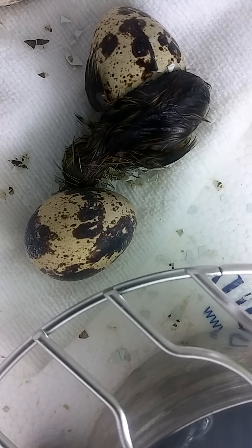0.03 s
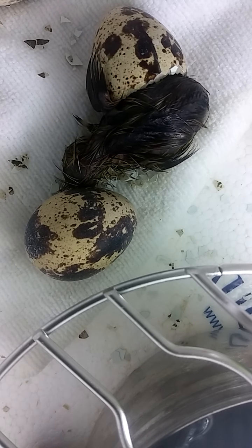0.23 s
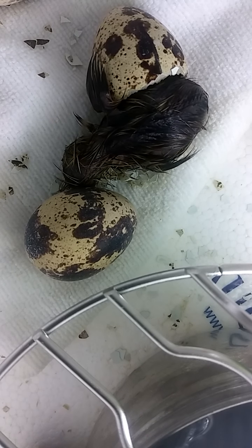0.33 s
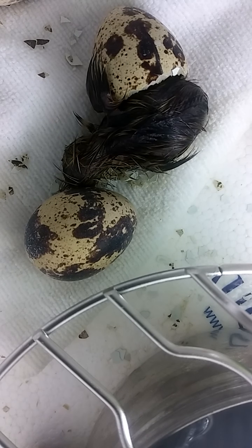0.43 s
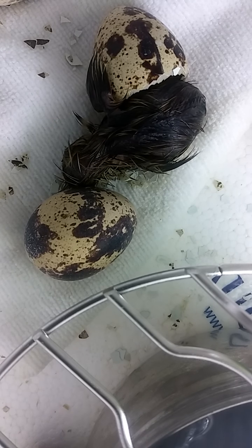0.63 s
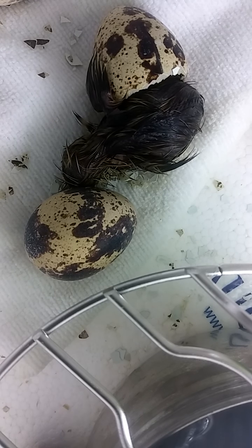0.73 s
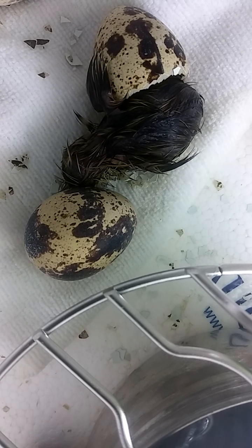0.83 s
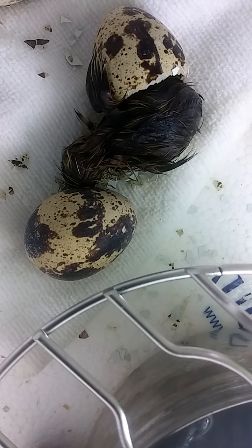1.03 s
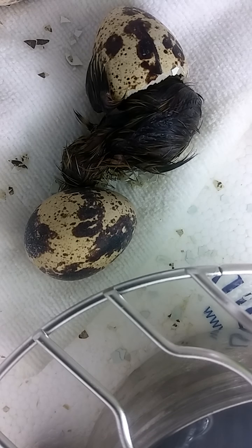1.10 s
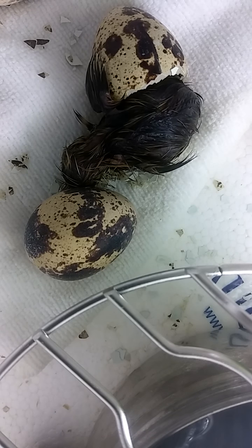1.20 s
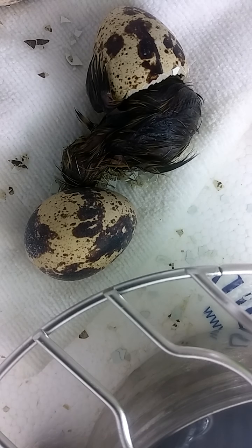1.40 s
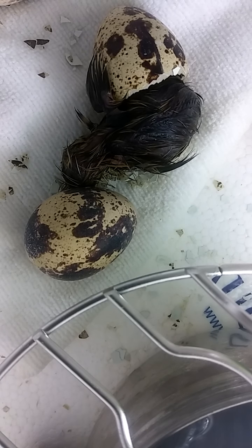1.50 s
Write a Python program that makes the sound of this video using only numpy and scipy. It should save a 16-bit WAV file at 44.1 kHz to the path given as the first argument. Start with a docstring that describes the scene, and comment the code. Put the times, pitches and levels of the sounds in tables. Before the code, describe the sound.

Small hard ticks sound close by in a plastic egg incubator, about four or five a second, loudest near 0.75 seconds. Each rings the housing briefly and fades in the room. Softer taps follow around 1.15 and 1.25 seconds, with a faint last one at 1.45. Hollow knocks join the contacts at about 0.6 and 1.25 seconds. A quiet fan hums steadily throughout.

```python
"""Beside a plastic egg incubator: small hard ticks, about 4.5 a second, then a few softer taps.
Each tick swells for some milliseconds as it scatters between the walls, rings the housing and
fades in the room. Heavier contacts add a hollow knock. The fan hums steadily underneath."""
import sys
import numpy as np
from scipy import signal
from scipy.fft import rfft, irfft
from scipy.io import wavfile

SR = 44100
rng = np.random.default_rng(int(sys.argv[2]) if len(sys.argv) > 2 else 0)


def file_out(sig):
    """Save sig as 16-bit WAV at sys.argv[1]."""
    # one column per channel
    cols = np.atleast_2d(sig).T
    # limit, then scale
    lim = np.clip(cols, -1, 1)
    pcm = np.round(lim * 32767).astype(np.int16)
    wavfile.write(sys.argv[1], SR, pcm)


N = 68355


def undb(db):
    """Decibels to gain."""
    return 10 ** (np.asarray(db) / 20)


def unit(x):
    """Scale to rms 1."""
    return x / np.sqrt(np.mean(x ** 2))


def colour(x, hz, db):
    """Filter by a curve of dB over log frequency."""
    bins_hz = np.fft.rfftfreq(2 * len(x), 1 / SR)
    gain = undb(np.interp(np.log(bins_hz + 1), np.log(hz), db))
    return irfft(rfft(x, 2 * len(x)) * gain)[:len(x)]


def narrow_noise(hz, width_hz):
    """Noise in one steep resonance, rms 1."""
    bins_hz = np.fft.rfftfreq(2 * N, 1 / SR)
    detune = 2 * (bins_hz - hz) / width_hz
    return unit(irfft(rfft(rng.standard_normal(2 * N)) / (1 + detune ** 2))[:N])


def envelope(age_s, swell_s, t60_s):
    """Linear rise, then exponential decay."""
    rise = np.clip(age_s / swell_s, 0, 1)
    return rise * np.exp(-np.log(1000) * np.maximum(age_s - swell_s, 0) / t60_s)


def ring(age_s, modes, swell_s, tilt_db_per_oct=0):
    """Decaying modes, new phases at each strike; the tilt pivots at 1 kHz."""
    phases = rng.uniform(0, 2 * np.pi, len(modes))
    out = np.zeros(N)
    for (hz, db, t60_s), phase in zip(modes, phases):
        gain = undb(db + tilt_db_per_oct * np.log2(hz / 1000))
        out += gain * np.sin(2 * np.pi * hz * age_s + phase) * envelope(age_s, swell_s, t60_s)
    return out


def fan():
    """Soft rush of air, two steady motor tones and a wavering hum."""
    # Each row: frequency in Hz, relative level in dB.
    air_curve = [(18, -40), (30, -15.5), (134, -19.5), (204, -12.5), (273, -12), (319, -13.5), (437, -4.5),
                 (569, -16), (632, -7.5), (780, -12), (937, -7), (1130, -11.5), (1390, -11), (4300, -20.5),
                 (16000, -40)]
    # Each row: frequency in Hz, level in dB.
    motor_tones = [(439, -67), (721.5, -64.5)]
    # Each row: centre in Hz, width in Hz, level in dB.
    hum_bands = [(66.4, 11, -79), (159.4, 31, -75.5), (444, 15, -70), (509.6, 25.6, -66.5),
                 (616, 8.7, -70.5), (830.5, 10, -70)]
    t = np.arange(N) / SR
    air = undb(-57) * unit(colour(rng.standard_normal(N), *np.array(air_curve).T))
    motor = sum(undb(db) * np.sin(2 * np.pi * (hz * t + rng.random())) for hz, db in motor_tones)
    hum = sum(undb(db) * narrow_noise(hz, width_hz) for hz, width_hz, db in hum_bands)
    return air + motor + hum


def knocks():
    """Two heavier contacts sound the hollow body; one light touch rings thinly."""
    # Each row: start in seconds, swell in seconds, gain in dB, tilt in dB per octave.
    contacts = [(0.575, .024, -41.5, -10), (1.235, 0.019, -42, -0.5)]
    # Each row of both: frequency in Hz, gain in dB, T60 in seconds.
    body_modes = [(644.4, -0.5, 0.17), (695, -11.5, 0.48), (760, -6, 0.39), (1093, -1, 0.32),
                  (1165, -8, .27), (1478, 1.5, 0.17), (1580, -1.5, 0.17), (1635, -1.5, 0.31),
                  (1744, -8.5, 0.35), (2440, -3, 0.35), (2490, -7, 0.39), (2940, -9, 0.4),
                  (3100, -11, 0.19), (3910, -11, 0.25)]
    touch_modes = [(1017, -59, .33), (1200, -53, .3), (1275, -58, .22), (1416, -52, .35)]
    t = np.arange(N) / SR
    hollow = sum(undb(db) * ring(t - start_s, body_modes, swell_s, tilt)
                 for start_s, swell_s, db, tilt in contacts)
    touch_start_s = 1.148
    return hollow + ring(t - touch_start_s, touch_modes, swell_s=0.032)


def wall_scatter(noise, age_s, swell_s):
    """Dense reflections between the walls: treble peaks first, lows build up."""
    # Each row: band centre in Hz, spectral density in dB, T60 in seconds.
    bands = [(151, -34, 0.25), (278, -6, 0.57), (425, -11, 0.24), (630, 0, 0.46), (870, -9, 0.9),
             (1065, -2, 0.44), (1650, -2, 0.32), (1960, -4.5, 0.39), (2270, -1, 0.34), (3430, -3, 0.27),
             (5800, 1, 0.21), (7570, -1.5, 0.23), (10600, -7, 0.26), (14400, -2, 0.16)]
    log_centres = np.log([hz for hz, _, _ in bands])
    log_bins = np.log(np.fft.rfftfreq(N, 1 / SR) + 1)
    spectrum, out = rfft(noise), np.zeros(N)
    for (hz, db, t60_s), selector in zip(bands, np.eye(len(bands))):
        band = irfft(spectrum * np.interp(log_bins, log_centres, selector), N)
        band_swell_s = swell_s * (4000 / hz) ** 0.21
        out += band * undb(db) * envelope(age_s, band_swell_s, t60_s)
    return out


def ticks():
    """Each tick: the part's brief ping, scatter, housing ring and room tail, coloured by hardness."""
    # Each row: start in seconds, swell in seconds, gain in dB, ring gain in dB, ping gain in dB,
    # then gain in dB at each of colour_hz. The first tick is already fading at time zero.
    contacts = [(-0.115, .010, -38.5, -13, -12, 6, -11, 0, 0, -2, -14),
                (0.103, 0.011, -31, -9, -8, -11.5, -14, 0, 7, -6, -13),
                (0.315, 0.0081, -32, -8, -9.5, -5.5, -1, 5, 2.5, -5, -14),
                (0.546, 0.011, -29.5, -7.5, -11, -5.5, 3, 8, 2, -7.5, -19.5),
                (0.575, 0.0027, -31.5, -3.5, 4, -5.5, -0.5, -9.5, 0, -7.5, -24),
                (0.752, 0.0078, -26.5, -7.5, -5, -11, -3.5, 2, -2, -15, -22.5),
                (1.147, 0.024, -47, -22, -22, -1, 8, -1.5, -9.5, -8.5, -16),
                (1.236, 0.012, -38.5, -18, -4, -1, 7, 7, -4, -9, -16.5),
                (1.450, 0.014, -42.5, -28, -41, -26, -28, -12, -18, -11, -21)]
    colour_hz = [650, 1300, 2400, 4300, 8000, 14000]
    # Each row of both: frequency in Hz, gain in dB, T60 in seconds.
    ping_modes = [(2492, 0, 0.1), (2613, -6, 0.052), (3015, -6, 0.1), (3346, -12, 0.13)]
    housing_modes = [(649.4, -1.5, 0.36), (1093, -1.5, 0.34), (1186, -2.5, 0.19), (1484, -5, 0.16),
                     (1566, -3, 0.21), (1655, -1.5, 0.25), (2093, 1.5, 0.22), (2153, -2.5, 0.19),
                     (2273, -6.5, 0.4), (2414, -5, 0.29), (2795, -8, 0.36), (3103, -5.5, 0.18),
                     (4020, -3.5, 0.18), (4480, -5.5, 0.18)]
    # Late reverberation. Each row: frequency in Hz, gain in dB.
    room_curve = [(300, -40), (1000, -27), (2500, -24), (6000, -22), (12000, -16)]
    shared = 0.52  # share of the scatter's power alike for all ticks
    t, out = np.arange(N) / SR, np.zeros(N)
    wall_path = rng.standard_normal(N)
    for start_s, swell_s, db, ring_db, ping_db, *colour_db in contacts:
        age_s = t - start_s
        noise = np.sqrt(shared) * np.roll(wall_path, int(start_s * SR))
        noise += np.sqrt(1 - shared) * rng.standard_normal(N)
        scatter = undb(3.5) * wall_scatter(noise, age_s, swell_s)
        ping = undb(ping_db) * ring(age_s, ping_modes, swell_s)
        room = colour(rng.standard_normal(N), *np.array(room_curve).T)
        room *= envelope(age_s, swell_s=0.033, t60_s=1.0)
        housing = 0.5 * undb(ring_db) * ring(age_s, housing_modes, swell_s=0.029)
        out += undb(db) * colour(scatter + ping + housing + room, colour_hz, colour_db)
    return out


def scene():
    """Ticks and knocks over the fan, mono."""
    return (ticks() + knocks() + fan())[None]


def record(dry):
    """Band limit: 48 Hz to 15.9 kHz."""
    highpass = signal.butter(4, 48, "highpass", fs=SR, output="sos")
    lowpass = signal.ellip(10, .2, 70, 15900, fs=SR, output="sos")
    return signal.sosfilt(lowpass, signal.sosfilt(highpass, dry))


dry = scene()
out = record(dry)
file_out(out)
```